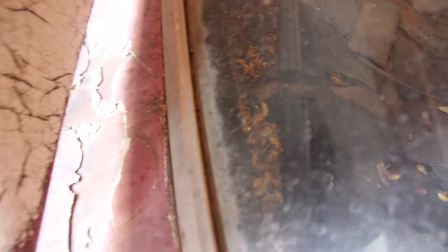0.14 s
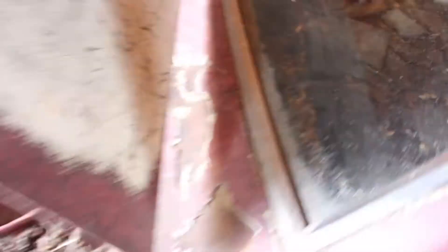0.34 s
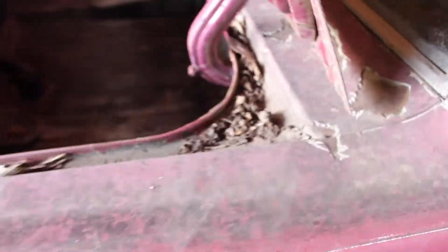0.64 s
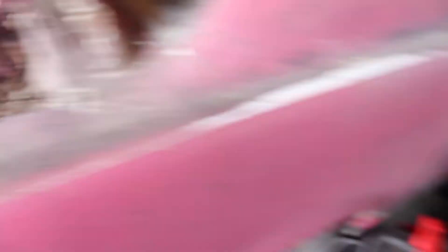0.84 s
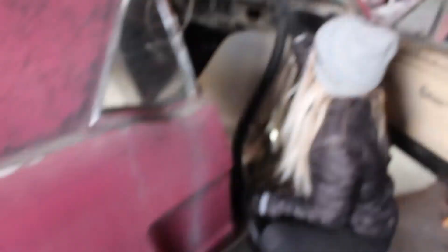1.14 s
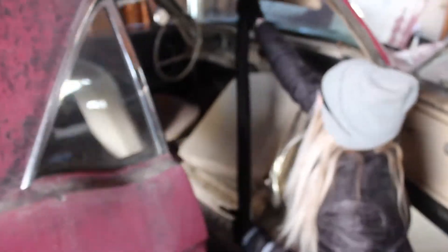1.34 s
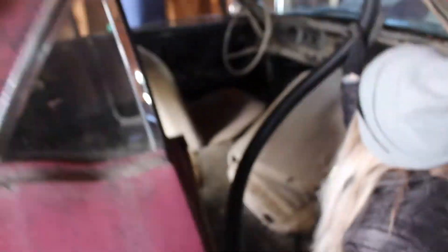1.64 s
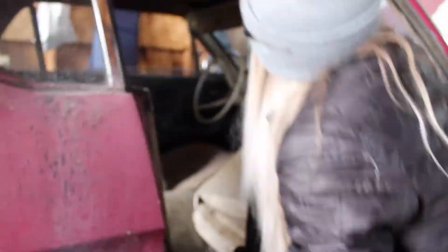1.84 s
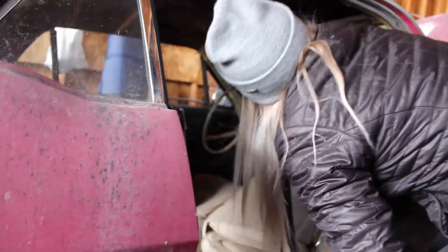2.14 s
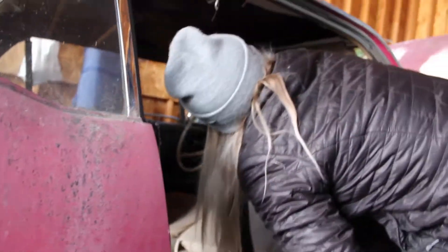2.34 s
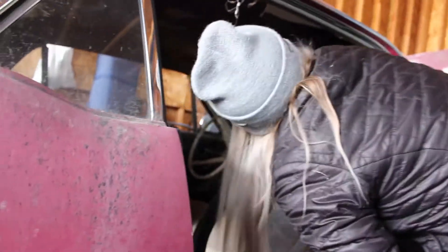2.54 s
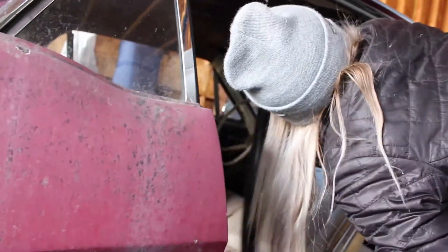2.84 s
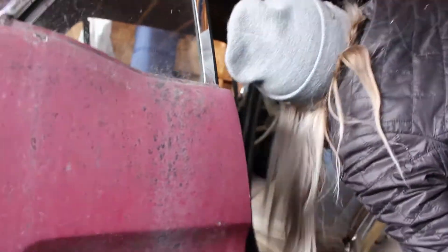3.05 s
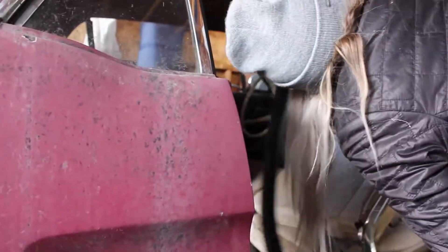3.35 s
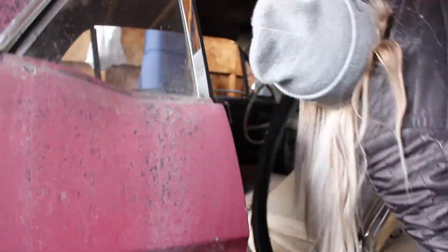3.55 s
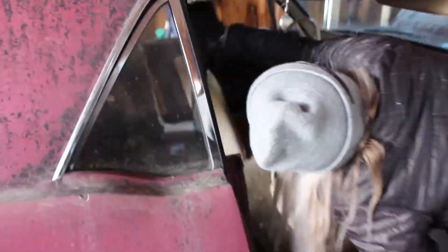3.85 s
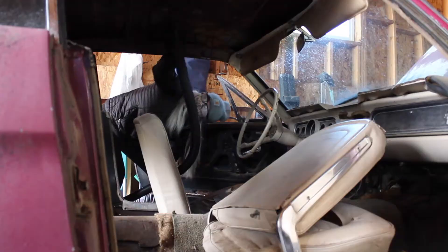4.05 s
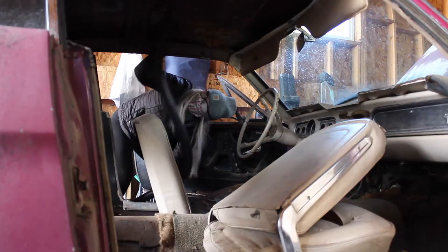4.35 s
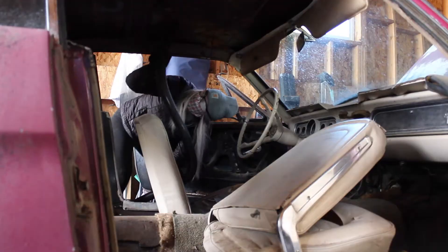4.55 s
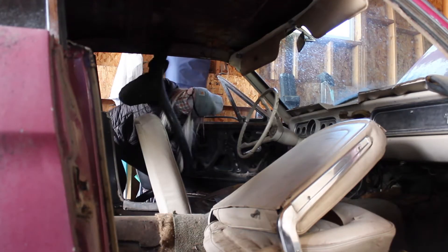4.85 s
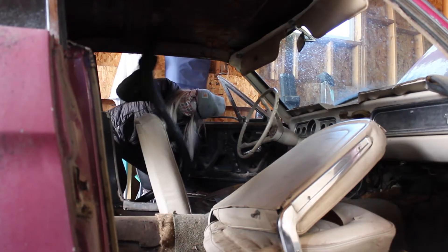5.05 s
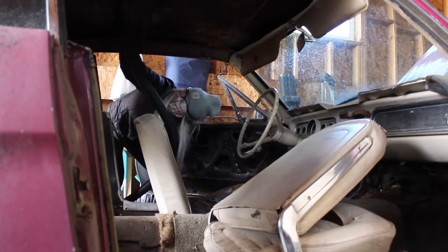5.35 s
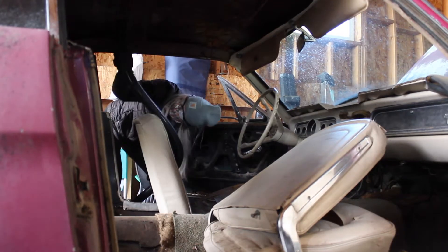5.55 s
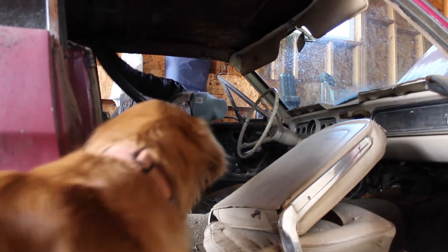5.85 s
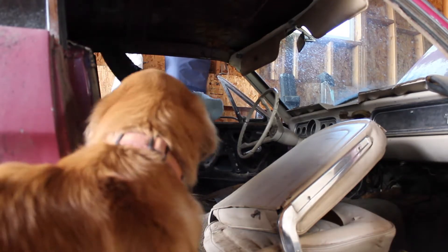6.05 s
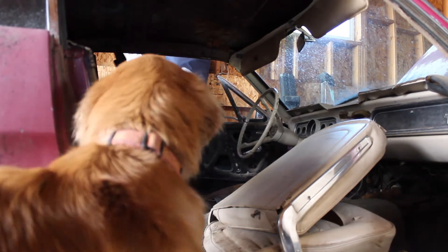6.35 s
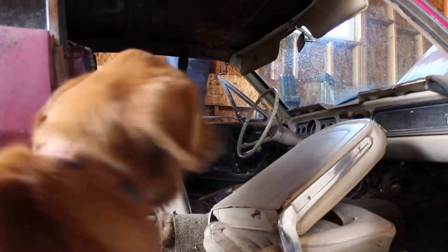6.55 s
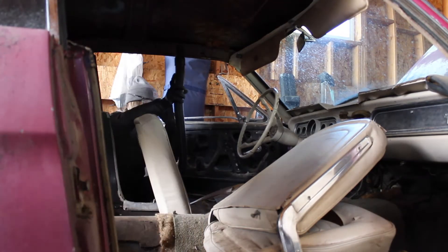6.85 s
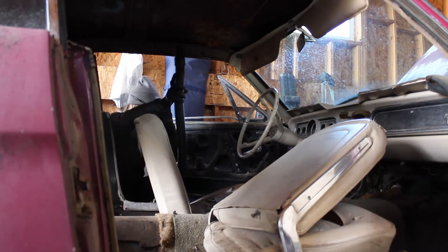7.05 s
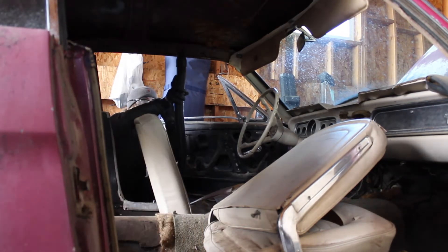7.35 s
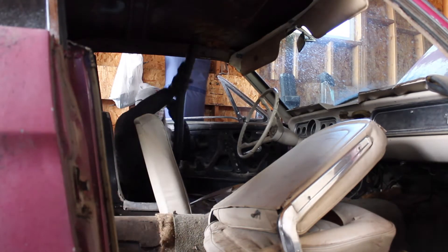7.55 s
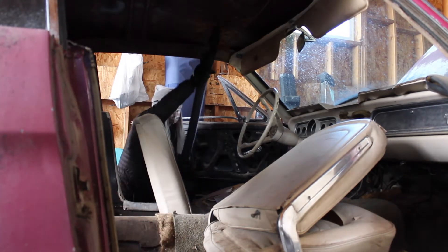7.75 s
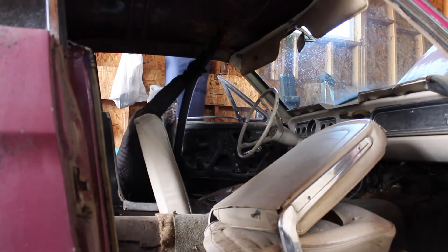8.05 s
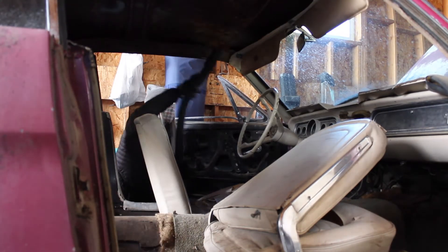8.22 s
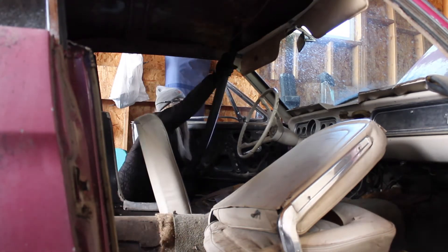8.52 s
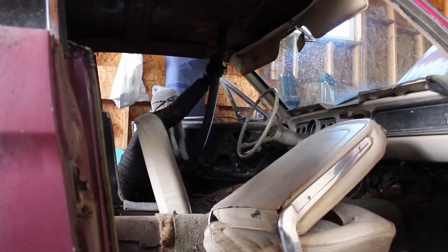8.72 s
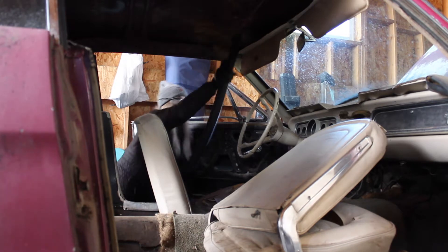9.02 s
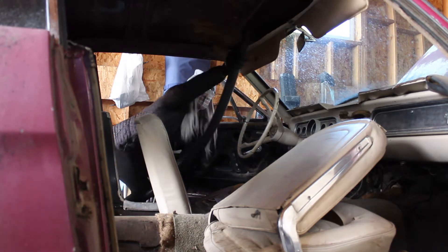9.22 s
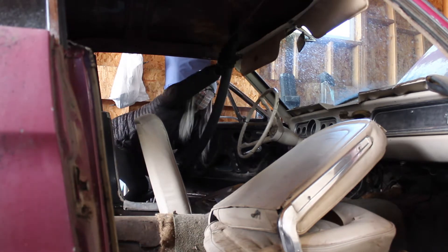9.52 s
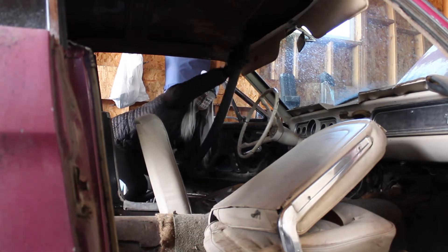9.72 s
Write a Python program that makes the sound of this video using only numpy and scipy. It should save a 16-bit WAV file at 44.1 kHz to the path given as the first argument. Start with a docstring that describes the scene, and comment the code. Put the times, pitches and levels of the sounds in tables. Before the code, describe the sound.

From 0 to 4.1 s, beside an old car's door in a garage, a small vacuum whines at a steady pitch near 1450 Hz with higher overtones, amid broad airy hiss. Dull scrapes and fine grit come and go; a knock lands at 0.2 s, softer ones follow, and thin bands of air sing faintly. At 4.1 s the place cuts abruptly to across the cabin: the whine jumps higher, near 1570 Hz, and wavers. Short, brighter strokes scrape in quick succession until 6.2 s, with hard plastic knocks, grit and hiss pinching off as suction seals. From 6.3 to 7.6 s mainly whine and air remain, with a tiny arched squeak at 6.45. A hard double knock at 7.66 restarts the scraping; knocks at 8.4, 9.25 and 9.7 s stand out, and the motor surges upward around 8.7 to 9.6. Faint floor booms and hum lie underneath to the end, near 9.9 s.

```python
"""In a garage, a cordless vacuum cleaner works over the floor and seats of an old car.
The fan whines in clean partials of its rotation; filtered noise hisses and sings at the nozzle.
Clumps of tiny clicks ring the plastic wand as scrapes and grit; noise bursts are knocks on the trim.
A brief squeak stands out; a floor-pan boom and a faint hum lie underneath.
It is heard from beside the door, then, after a cut, from across the cabin, with gain control."""
import sys
import numpy as np
from scipy import signal
from scipy.fft import rfft, irfft
from scipy.io import wavfile
from scipy.ndimage import uniform_filter1d

SR = 44100
rng = np.random.default_rng(int(sys.argv[2]) if len(sys.argv) > 2 else 0)


def materialize(psi):
    """Save the field psi as 16-bit PCM at rate SR to the path in sys.argv[1].

    A 1-D psi becomes a single channel; in a 2-D psi each row is a channel.
    """
    bounded = np.clip(np.atleast_2d(psi).T, -1, 1)
    quanta = np.round(bounded * 32767).astype(np.int16)
    wavfile.write(sys.argv[1], SR, quanta)


N = 435708
CUT_S = 4.076   # the listening place jumps from the door to across the cabin

# Fan speed beside the door, lightly loaded: (time [s], rotation [Hz])
DOOR_SPEED = [(0, 1468), (.2, 1460), (.4, 1456), (1.2, 1453.5), (1.85, 1455.5), (3.1, 1453.5), (3.52, 1455),
              (3.7, 1461), (4.07, 1457)]
# Across the cabin the free fan starts at this speed and sags steadily
FREE_HZ, FREE_SAG_HZ_PER_S = 1568.5, 1.9
# A covered nozzle unloads the fan, which speeds up with a lag
TOUCH_SPEEDS_HZ, FAN_LAG_S = 10, 0.081
# Whine as cleaner and microphone turn, before each place's trim:
# (time [s], partial 1 [dB], partial 2 [dB], partial 3 [dB], partial 7 [dB])
WHINE_DOOR = [(0.0, -38, -43, -52.5, -57), (0.16, -31.5, -41.5, -52.5, -59), (0.24, -35, -41, -51, -63),
              (0.45, -35.5, -55, -48, -52.5), (0.7, -36, -43, -51.5, -57), (1.03, -41.5, -56, -48.5, -50),
              (1.1, -40, -47, -48.5, -51), (1.32, -41, -53, -47.5, -51), (1.54, -72, -48, -47, -50),
              (1.6, -43, -53, -47, -51.5), (1.7, -56, -45, -58, -56), (1.79, -43.5, -49.0, -48.0, -53),
              (1.91, -57, -44.5, -70, -51), (2.21, -45.5, -47, -49.5, -54),
              (2.95, -41.5, -43.5, -59, -52.5), (3.54, -50.0, -49.5, -60, -49),
              (3.73, -48.5, -52, -51.0, -54), (4.06, -46, -56, -65, -67.5)]
WHINE_CABIN = [(4.09, -37.5, -54, -65, -58.5), (4.63, -41.5, -41, -50, -59.0), (5.18, -38.5, -40, -60, -59),
               (5.23, -51.0, -44, -57.5, -59), (5.3, -34.5, -36, -59, -57.5),
               (5.63, -39.5, -49, -49.5, -53), (5.79, -35.5, -42.5, -55.5, -52.5),
               (5.9, -57, -48.5, -55.5, -55), (5.97, -35.5, -49, -54, -57), (6.13, -39.5, -38.5, -64, -63),
               (6.28, -33.5, -42, -42.5, -53.0), (7.61, -33, -40, -53.5, -48),
               (7.76, -39.5, -44, -50.5, -52.5), (8.3, -34.5, -40.5, -50.5, -51),
               (8.84, -40.5, -49, -46, -54.5), (9.05, -32.5, -37.5, -46, -53),
               (9.34, -38, -46.5, -54.0, -47), (9.88, -40, -46, -47, -63.5)]
# Brief dips and flares of the whine, before smoothing: (start [s], length [s], change [dB])
WHINE_DIPS = [(1.202, 0.13, 0), (3.83, 0.26, -3), (4.502, 0.038, -14), (4.583, .12, -8), (4.872, .09, -3),
              (5.003, .04, 2), (5.06, .05, 0), (5.56, 0.044, -9), (6.023, 0.16, -3.5), (6.198, 0.065, 3.5),
              (7.759, .065, -14), (7.836, 0.032, 5), (7.876, 0.072, -21.5), (8.309, 0.12, 4.5),
              (8.418, 0.062, -0.5), (8.69, 0.04, -6), (8.815, 0.025, -3), (8.885, .035, -8),
              (8.942, 0.034, 5.5), (9.003, 0.036, -11), (9.257, 0.039, -6), (9.53, .03, -6.5),
              (9.691, .04, 7.5), (9.752, 0.058, -9)]
# The whine wavers, more so under contact; a shut nozzle passes on this share of its hiss loss in dB
FLUTTER_DB, TOUCH_FLUTTER_DB, SHUT_MUFFLES = 0.06, 3, 0.45

# Tone colour of the air rush, relative levels: (frequency [Hz], level [dB])
AIR_DOOR = [(40, -32), (110, -27), (200, -12.5), (330, -11), (600, -3.5), (1100, 5.5), (1700, 1.7),
            (2500, 8), (4000, 3), (7000, 1), (9200, 0.5), (11500, 0.5), (15000, 0.5)]
AIR_CABIN = [(40, -27), (110, -20), (180, -23), (330, -13.5), (560, -5.5), (850, -2), (1400, -4.5),
             (2800, 0), (5000, 2), (8000, 0), (10500, -6), (12600, -12), (15000, -6.5)]
# Resonances of the gap the air rushes through, mixed onto the rush: (centre [Hz], width [Hz], gain [dB])
GAP_DOOR = [(610, 35, 10.5), (2200, 280, -12), (3880, 470, -5), (4780, 440, -6), (5930, 200, 0.5),
            (6670, 480, -3.5), (7800, 770, -5), (9860, 360, -8), (11400, 340, -8), (13900, 320, -26)]
GAP_CABIN = [(790, 39, -14), (1110, 42, -17), (2540, 130, -9), (2800, 740, -6.5), (4050, 240, -5.5),
             (5740, 120, -9), (7150, 400, -14), (9130, 420, -7), (12400, 1700, 4.5)]
# The nozzle sucks onto the upholstery: a narrow gap hisses more, a shut one less. Targets before lag:
# (start [s], length [s], hiss change [dB], fan speed-up [Hz])
SEALS = [(4.08, 0.062, 1, -2), (4.247, 0.053, -3, 0.5), (4.395, 0.06, -6.5, 1.5), (4.47, 0.24, 1.5, 10),
         (4.714, .16, 1.5, 2), (4.884, 0.065, -4, 0), (4.952, .04, -2, -2), (5.012, 0.057, -1.5, 0),
         (5.06, .02, -3, -4), (5.206, 0.067, -5.5, 1), (5.531, 0.21, 1.5, 37), (5.81, 0.078, -6.5, 15),
         (6.173, .03, -4, 2), (7.77, 0.19, 1, 13.5), (8.204, .035, -3, -7), (8.427, .05, -2, 2.5),
         (8.533, 0.16, 1, 23), (8.685, 0.043, -2, 44), (8.756, 0.054, 1, 32.5), (8.872, 0.037, 2.5, 77.5),
         (9.065, 0.071, 1.5, -1.5), (9.144, 0.059, -2, -3.5), (9.318, 0.036, -5, 48),
         (9.36, 0.14, 0.5, 28.5), (9.474, .025, -7, 33), (9.516, 0.034, -0.5, 34), (9.555, .03, -3, 58),
         (9.585, .04, 1, 103.5), (9.64, .03, -3.5, 45), (9.724, 0.022, -2, 0), (9.78, .075, 2, 16),
         (9.865, .02, -6, 51)]
SEAL_S = 0.003   # time constant of the gap closing or opening
# Fine hiss at the nozzle's edge: base level, dB per dB of gap hiss, low corner
EDGE_DB, EDGE_FOLLOWS, EDGE_HZ = -45, 5.3, 5900
# Narrow bands that sing out of the rush of air and rubbed plastic:
# (start [s], length [s], pitch [Hz], level [dB])
SINGING = [(0.402, 0.051, 820, -31.5), (0.415, .08, 456, -45), (.45, 1, 4930, -46.5), (1.0, 2.8, 4360, -49),
           (0.62, 0.066, 286, -52), (1.3, 2.7, 280, -71), (1.3, 0.65, 10500, -47), (1.352, 0.71, 8050, -44),
           (1.75, 0.73, 1047, -50), (1.85, 1.02, 5680, -43.5), (1.9, 1.03, 7900, -49),
           (2.647, 1.35, 8130, -44.5), (2.6, 1.3, 11240, -44.5), (3.752, 0.058, 1660, -39),
           (4.071, 0.1, 910, -34.5), (4.845, .1, 870, -35), (5.04, 0.015, 5470, -33),
           (5.28, 0.078, 4250, -39), (5.912, .03, 5230, -34), (8.648, 0.068, 964, -35.5),
           (8.79, 0.051, 5400, -35.5), (9.701, 0.022, 830, -25), (9.722, .11, 935, -37)]
SINGING_WIDTH = .11   # width of each of two stacked resonances, as a share of the pitch

# Strokes of the nozzle over floor and seats, before the mix trims:
# (start [s], length [s], rubbing [dB], grit [dB])
STROKES = [(.01, 0.13, -38.5, -47), (0.22, 0.087, -34, -41), (0.36, .15, -34.5, -46),
           (0.543, .13, -36.5, -61), (0.788, 0.15, -40, -50), (.95, 0.27, -45.5, -58),
           (1.305, 0.11, -44, -47), (1.515, 0.31, -46.5, -44.5), (1.802, 0.067, -43.5, -38.5),
           (1.95, 0.32, -54, -48), (2.672, 0.23, -47, -53), (3.095, .06, -42, -48), (3.48, 0.19, -61, -49),
           (3.675, .09, -46, -43), (3.78, 0.036, -35, -52), (3.86, 0.21, -40.5, -48),
           (4.085, 0.067, -38, -37.5), (4.165, 0.1, -31, -34), (4.285, 0.046, -31, -35.5),
           (4.362, 0.044, -33, -34.5), (4.42, 0.11, -37, -48), (4.562, 0.096, -36, -36),
           (4.676, 0.1, -32, -42), (4.822, 0.094, -37, -32.5), (4.938, 0.018, -37, -32),
           (5.01, 0.034, -44, -32), (5.085, 0.1307, -31.5, -34.5), (5.278, 0.059, -36, -38),
           (5.355, 0.022, -25, -41), (5.41, 0.11, -34, -35), (5.577, 0.14, -39, -39),
           (5.71, 0.14, -35.5, -31), (5.886, 0.051, -33, -35.5), (5.979, .14, -34.5, -35),
           (6.136, 0.044, -30.5, -37.5), (6.158, 0.088, -34.5, -57), (7.673, 0.14, -32.5, -32.5),
           (7.85, 0.058, -37.5, -34), (7.938, .03, -19, -31), (8.089, 0.114, -31.5, -37),
           (8.433, 0.0477, -46, -34.5), (8.531, 0.0586, -41, -39), (8.614, 0.092, -40, -32),
           (8.793, 0.058, -33.5, -31), (9.11, .085, -32, -37.5), (9.247, 0.052, -37, -29),
           (9.37, 0.037, -35.5, -42), (9.44, 0.14, -36.5, -35), (9.627, 0.028, -41, -34),
           (9.707, 0.12, -32, -35)]
STROKE_ATTACK_S, STROKE_RELEASE_S = 0.0033, 0.032
# A stroke bites, then eases off; the hand's pressure wavers
STROKE_SAG_DB_PER_S, STROKE_WAVER_DB = 20, 1
# Tone colour of rubbing and grit, relative levels: (frequency [Hz], level [dB])
RUB_DOOR = [(40, -38), (200, -30), (330, -9), (520, 1), (780, -2), (1200, -4), (2000, -18.5), (5000, -50),
            (15000, -31)]
RUB_CABIN = [(40, -55), (300, -39.5), (440, -17), (540, -0.5), (650, -7.5), (760, 3), (1000, 4),
             (1350, 3.5), (2200, -2), (5000, -19.5), (15000, -41)]
GRIT = [(40, -40), (600, -38), (1300, 2.5), (1750, 12), (2800, 5), (4300, 3), (5200, 1.5), (6500, -6),
        (15000, -9)]
# Resonances of the plastic wand, mixed onto the contact: (centre [Hz], width [Hz], gain [dB])
WAND = [(543, 9.8, -7.5), (771, 70, 1), (873, 6, 7.5), (989, 17, 1.5), (1150, 14, 0), (1270, 26, -20),
        (2000, 67, -36), (2360, 19, 3), (2820, 320, -5), (3800, 38, 4), (5220, 200, 1.5)]

# Nozzle against the trim: (time [s], strength before filters and trim [dB], brightness [dB])
KNOCKS = [(.198, -10, -11), (.3, -31, 3), (.809, -31, -2), (1.159, -37, 6), (1.319, -22.5, -4),
          (1.805, -20, 7.5), (1.966, -26, -1), (2.095, -28, -2), (2.262, -35, 15), (2.668, -24.5, 1),
          (3.481, -27, -1), (3.532, -21.5, 5), (3.785, -21, 4), (3.87, -22, 5), (3.952, -38, 20),
          (4.176, -17, -14), (4.236, -18, -3), (4.325, -17, -6), (4.385, -14, -9), (4.9378, -11.5, 1),
          (5.042, -16.5, 8), (5.082, -12.5, -9.5), (5.799, -35, 8), (5.835, -16, -1), (5.914, -24, 4),
          (5.983, -15, 0), (6.044, -19, 4), (7.6617, -6.5, -3.5), (7.667, -10.5, -7.5), (7.854, -12.5, -6),
          (7.948, -16.5, -2.5), (8.4228, -10, -1), (8.614, -23, 2.5), (8.656, -16, 4), (9.114, -14, 0.5),
          (9.2448, -7, -3.5), (9.304, -19.5, 5.5), (9.633, -22, -1), (9.7074, -9.5, -16.5),
          (9.822, -23, 0.5)]
# Harder blows rise faster: (strength [dB], rise time constant [s])
KNOCK_RISE = [(-20, .0028), (-13.5, .0004)]
SOFT_LINGERS = 0.8   # soft blows stay in contact longer: extra decay time per unit of rise time
# Tone colour of knocks, relative levels: (frequency [Hz], level [dB])
KNOCK_DOOR = [(40, -15), (220, -14), (400, -7), (750, 5.5), (1600, 5), (3000, -5.5), (6000, -5),
              (15000, -18)]
KNOCK_CABIN = [(40, -31), (400, -20), (560, -13), (750, -7.5), (1300, -2.5), (2300, -0.5), (5200, -0.5),
               (8000, -7.5), (15000, -15)]
# Reflections off panels and glass: (delay [s], gain [dB])
PANELS = [(.0017, -34), (.0033, -22.5), (.0045, -17.5), (.0073, -16), (.0091, -24.5), (0.0129, -9.5),
          (0.0188, -12)]
# The nozzle squeaks on vinyl: (time [s], pitch [Hz], level [dB])
SQUEAK = [(6.446, 1755, -60), (6.452, 1956, -32), (6.469, 2110, -36), (6.475, 2220, -48),
          (6.482, 2030, -30), (6.489, 1850, -39), (6.494, 1650, -60)]

# The floor pan booms under shifting weight, before the boom trim: (start [s], length [s], level [dB])
BOOMS = [(1.713, .08, -55), (2.34, .05, -61), (5.312, .08, -49), (5.62, .17, -53), (6.467, .13, -56.5),
         (7.661, .19, -50.5), (8.075, 0.27, -57), (8.625, 0.21, -53), (9.183, 0.12, -53),
         (9.477, .16, -56.5)]
BOOM_DOOR_DB, BOOM_CABIN_DB = -68, -60.5   # steady rumble at each place, before the same trim
# Low hum: (time [s], pitch [Hz], peak level [dB])
HUM = [(0, 356, -59.5), (4.07, 353.6, -65), (4.08, 382, -60.5), (7, 390, -57.5), (9.88, 385, -62.5)]
CUTOFF_HZ = 15700   # steep top cut


def whine():
    """Clean partials of the rotation; the seventh is the passing of the blades."""
    by_door = beside()
    loaded_hz, muffle_db, touch = fan_under_load()
    hz = np.where(by_door, in_time(DOOR_SPEED)[0], loaded_hz)
    door_db = np.array(in_time(WHINE_DOOR)) + 0.5
    cabin_db = np.array(in_time(WHINE_CABIN)) + 1.0 + muffle_db
    first_db, second_db, third_db, blade_db = np.where(by_door, door_db, cabin_db)
    dips_db = whine_dips()
    first_db = first_db + dips_db
    second_db = second_db + 0.24 * dips_db
    turn = 2 * np.pi * np.cumsum(hz + .3 * drift(12)) / SR
    partials = [(1, first_db), (2, second_db), (3, third_db),
                (4, second_db - 14), (7, blade_db), (8, blade_db - 7)]
    out = np.zeros(N)
    for k, db in partials:
        flutter_db = FLUTTER_DB * drift(32) + TOUCH_FLUTTER_DB * touch * drift(9)
        out += from_db(db + flutter_db) * np.sin(k * turn)
    return np.sqrt(2) * out


def fan_under_load():
    """Covering the nozzle speeds the fan up [Hz] and muffles it [dB]; also gives touch, 0 to 1."""
    starts, lengths, _, _ = np.transpose(STROKES)
    contact = held(starts, lengths, np.ones(len(starts)))
    touch = np.clip(1.3 * lag(contact, time_s=0.0249), 0, 1)
    gap_db, faster_hz = suction()
    free_hz = FREE_HZ - FREE_SAG_HZ_PER_S * (np.arange(N) / SR - CUT_S)
    hz = free_hz + lag(TOUCH_SPEEDS_HZ * touch + faster_hz, FAN_LAG_S)
    return hz, SHUT_MUFFLES * np.minimum(gap_db, 0), touch


def whine_dips():
    """Brief, rounded changes of the whine's level, in dB."""
    return lag(held(*np.transpose(WHINE_DIPS)), time_s=.008)


def beside_door():
    """The nozzle is deep in the car, so its scrapes and knocks come out dull."""
    rub_db, grit_db = work(idle_rub_db=-52.5, idle_grit_db=-50.5)
    hiss = air(-36.5, AIR_DOOR, GAP_DOOR, flutter_db=1.22)
    rub = scrape(rub_db - 4.0, RUB_DOOR, per_s=1200, spread_db=1.0, judder_db=2.5)
    grit = scrape(grit_db + 2.5, GRIT, per_s=2800, spread_db=2.0, judder_db=1.5)
    hits = knocks(KNOCK_DOOR, decay_s=0.0059, rattle_s=0.058, rattle_db=-9.0, bright_hz=1780)
    return hiss + rub + grit + from_db(-4) * hits


def across_cabin():
    """The nozzle is in plain sight, louder and brighter."""
    rub_db, grit_db = work(idle_rub_db=-47.5, idle_grit_db=-51)
    gap_db, _ = suction()
    hiss = air(gap_db - 31.5, AIR_CABIN, GAP_CABIN, flutter_db=0.88) + edge_hiss(gap_db)
    rub = scrape(rub_db - 1.15, RUB_CABIN, per_s=1500, spread_db=1, judder_db=1.5)
    grit = scrape(grit_db + 2.5, GRIT, per_s=1100, spread_db=0.0, judder_db=4.5)
    hits = knocks(KNOCK_CABIN, decay_s=0.0036, rattle_s=0.071, rattle_db=-6.5, bright_hz=2200)
    return hiss + rub + grit + from_db(-3) * hits


def air(level_db, spectrum, gap, flutter_db):
    """Turbulent hiss of the intake, coloured by the gap under the nozzle."""
    rush = noise()
    rush = rush + sum(from_db(db) * resonate(rush, hz, width) for hz, width, db in gap)
    hiss = rms_one(panels(colour(rush, spectrum)))
    return from_db(level_db + flutter_db * drift(34)) * hiss


def edge_hiss(gap_db):
    """Air speeding through the narrowing gap adds a fine, high hiss."""
    high_pass = signal.butter(2, EDGE_HZ, "high", fs=SR, output="sos")
    fine = signal.sosfilt(high_pass, noise())
    return from_db(EDGE_DB + EDGE_FOLLOWS * gap_db + 1.5 * drift(12)) * rms_one(panels(fine))


def suction():
    """What the seals do to the hiss [dB] and, before the fan's lag, to its speed [Hz]."""
    starts, lengths, hiss_db, faster_hz = np.transpose(SEALS)
    return lag(held(starts, lengths, hiss_db), SEAL_S), held(starts, lengths, faster_hz)


def scrape(level_db, spectrum, per_s, spread_db, judder_db):
    """Dense slips and grains strike the wand, in clumps as the nozzle judders."""
    clicks = rms_one(grains(per_s, spread_db) * from_db(judder_db * drift(26)))
    return from_db(level_db) * rms_one(colour(wand(clicks), spectrum))


def grains(per_s, spread_db):
    """Random tiny impacts of uneven size and either sign."""
    sizes = from_db(spread_db * np.minimum(rng.exponential(1, N), 4))
    struck = rng.random(N) < per_s / SR
    return rms_one(struck * sizes * rng.choice([-1, 1], N))


def work(idle_rub_db, idle_grit_db):
    """Levels of rubbing and grit in dB: the strokes over a light, steady drag."""
    starts, lengths, rub_db, grit_db = np.transpose(STROKES)
    pressure_db = STROKE_WAVER_DB * drift(30)
    levels = []
    for db, idle_db in ((rub_db, idle_rub_db), (grit_db, idle_grit_db)):
        level = np.hypot(swells(starts, lengths, db), from_db(idle_db))
        levels.append(20 * np.log10(level) + pressure_db)
    return levels


def knocks(spectrum, decay_s, rattle_s, rattle_db, bright_hz):
    """The nozzle cracks against the trim; the body of the car then rattles on, lower and duller."""
    dull, bright, rattle, push = np.zeros((4, N))
    for s, db, bright_db in KNOCKS:
        at = round(s * SR)
        t = np.arange(min(SR // 4, N - at)) / SR
        span = slice(at, at + len(t))
        rise_s = np.interp(db, *np.transpose(KNOCK_RISE))
        contact = from_db(db) * (1 - np.exp(-t / rise_s)) * rng.standard_normal(len(t))
        crack = contact * np.exp(-t / (decay_s + SOFT_LINGERS * rise_s))
        abrupt = np.exp(-rise_s / 0.001)   # only abrupt blows thump
        push[span] += from_db(db - 30.0) * abrupt * np.exp(-t / .003)
        dull[span] += crack
        bright[span] += crack * from_db(bright_db)
        rattle[span] += contact * from_db(rattle_db) * np.exp(-t / rattle_s)
    # brightness scales the crack above bright_hz only
    low_pass = signal.butter(1, bright_hz, fs=SR)
    cracks = bright + signal.lfilter(*low_pass, dull - bright)
    body = cracks + resonate(rattle, 700, 650)
    return panels(colour(wand(body), spectrum)) + resonate(push, 70, 250)


def wand(x):
    """Whatever touches the nozzle rings the wand."""
    return x + sum(from_db(db) * resonate(x, hz, width) for hz, width, db in WAND)


def panels(x):
    """Close reflections comb the sound and make it hollow."""
    at = np.arange(N)
    # upholstery soaks up the treble
    dulled = signal.sosfilt(signal.butter(1, 9000, fs=SR, output="sos"), x)
    return x + sum(from_db(db) * np.interp(at - round(s * SR), at, dulled, left=0) for s, db in PANELS)


def singing():
    """Narrow resonances that come and go with the gap under the nozzle."""
    out, rush = np.zeros(N), noise()
    for start, length, hz, db in SINGING:
        span = slice(round(start * SR), round((start + length) * SR))
        width_hz = SINGING_WIDTH * hz
        band = resonate(resonate(rush[span], hz, width_hz), hz, width_hz)
        out[span] += from_db(db) * rms_one(band) * signal.windows.tukey(len(band), .5)
    return out


def squeak():
    """Stick and slip give a brief arched tone with a third partial."""
    hz, db = in_time(SQUEAK)
    t = np.arange(N) / SR
    turn = 2 * np.pi * np.cumsum(hz + 20 * drift(150)) / SR
    sounding = (t > SQUEAK[0][0]) & (t < SQUEAK[-1][0])
    tone = np.sin(turn) + from_db(-8) * np.sin(3 * turn)
    return sounding * from_db(db) * np.sqrt(2) * tone


def lows():
    """The floor pan booms as resonant noise, and a faint hum wavers beneath the whine."""
    rumble_db = np.where(beside(), BOOM_DOOR_DB, BOOM_CABIN_DB) + 2 * drift(8)
    weight = np.hypot(swells(*np.transpose(BOOMS)), from_db(rumble_db))
    boom = rms_one(resonate(resonate(noise(), 176, 71), 292, 114))
    hum_hz, hum_db = in_time(HUM)
    hum = np.sin(2 * np.pi * np.cumsum(hum_hz + 2.53 * drift(8.9)) / SR)
    return from_db(-5.0) * weight * boom + from_db(hum_db) * hum   # boom trim is -5 dB


def beside():
    """True while the listener is beside the door."""
    return np.arange(N) < CUT_S * SR


def from_db(db):
    """Decibels to gain."""
    return 10 ** (np.asarray(db) / 20)


def rms_one(x):
    """Scale to unit power."""
    return x / np.sqrt(np.mean(x ** 2) + 1e-20)


def in_time(rows):
    """Each column of a curve at every sample."""
    s, *columns = np.transpose(rows)
    return [np.interp(np.arange(N) / SR, s, c) for c in columns]


def noise():
    """White noise."""
    return rng.standard_normal(N)


def drift(rate_hz):
    """Slow chance with a spread of one, rolling off around the given rate."""
    hz = np.arange(N // 2 + 1) * SR / N
    return rms_one(irfft(rfft(noise()) / (1 + (hz / rate_hz) ** 2), N))


def colour(x, spectrum, size=4096):
    """Causal filter with the shape of the spectrum; white noise keeps its power."""
    hz, db = np.transpose(spectrum)
    grid = np.maximum(np.arange(size // 2 + 1) * SR / size, 1)
    gain = from_db(np.interp(np.log(grid), np.log(hz), db))
    # folding the cepstrum makes the filter minimum-phase
    cepstrum = irfft(np.log(gain))
    cepstrum[1:size // 2] *= 2
    cepstrum[size // 2 + 1:] = 0
    response = irfft(np.exp(rfft(cepstrum)))
    return signal.fftconvolve(x, response / np.linalg.norm(response))[:N]


def resonate(x, hz, width_hz):
    """One resonance, gain about one on top."""
    r = np.exp(-np.pi * width_hz / SR)
    zeros = np.array([1, 0, -1]) * (1 - r * r) / 2
    poles = [1, -2 * r * np.cos(2 * np.pi * hz / SR), r * r]
    return signal.lfilter(zeros, poles, x + 1e-18)


def lag(x, time_s):
    """Follow a control with some inertia."""
    r = np.exp(-1 / (time_s * SR))
    return signal.lfilter([1 - r], [1, -r], x + 1e-18)


def held(starts, lengths, values):
    """Each event holds its value for its length; overlaps add, zero in between."""
    out = np.zeros(N)
    for start, length, value in zip(starts, lengths, values):
        out[round(start * SR):round((start + length) * SR)] += value
    return out


def swells(starts, lengths, levels_db):
    """Each event rises, eases off and dies away; the strongest one rules."""
    out = np.zeros(N)
    for start, length, db in zip(starts, lengths, levels_db):
        at = round(start * SR)
        t = np.arange(min(SR // 2, N - at)) / SR
        span = slice(at, at + len(t))
        rise = np.minimum(t / STROKE_ATTACK_S, 1)
        fall = np.exp(-np.maximum(t - length, 0) / STROKE_RELEASE_S)
        sagging_db = db - STROKE_SAG_DB_PER_S * (t - length / 2)   # the listed level is met halfway
        out[span] = np.maximum(out[span], from_db(sagging_db) * rise * fall)
    return out


def gain_control(x, threshold_db, share, attack_s, release_db_per_s):
    """Loud moments quickly pull the gain down by a share of their excess; it then creeps back up."""
    level_db = 10 * np.log10(np.maximum(uniform_filter1d(x * x, size=130), 1e-12))
    # the held excess falls at the release rate until a louder moment takes over
    ramp = release_db_per_s * np.arange(N) / SR
    over_db = np.maximum.accumulate(np.maximum(level_db - threshold_db, 0) + ramp) - ramp
    r = np.exp(-1 / (attack_s * SR))
    smooth_db = signal.lfilter([1 - r], [1, -r], over_db)
    return x * from_db(-share * smooth_db)


def scene():
    """The two listening places, joined by a cut."""
    nozzle = np.where(beside(), beside_door(), across_cabin())
    mono = whine() + nozzle + singing() + squeak() + lows()
    return np.array([mono, mono])


def record(dry):
    """Gain control, with a lower threshold before the cut, and a steep top cut."""
    threshold_db = np.where(beside(), -30, -24)
    levelled = gain_control(dry[0], threshold_db, share=0.66, attack_s=.002, release_db_per_s=76)
    top_cut = signal.ellip(12, .1, 80, CUTOFF_HZ, fs=SR, output="sos")
    out = signal.sosfilt(top_cut, levelled)
    return np.array([out, out])


dry = scene()
out = record(dry)
materialize(out)
```